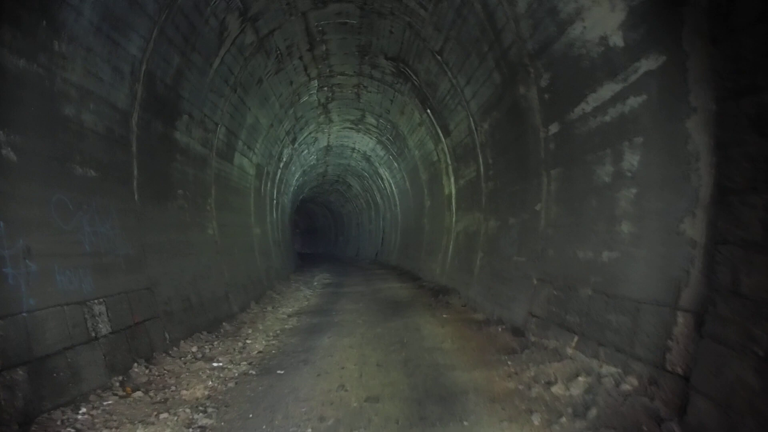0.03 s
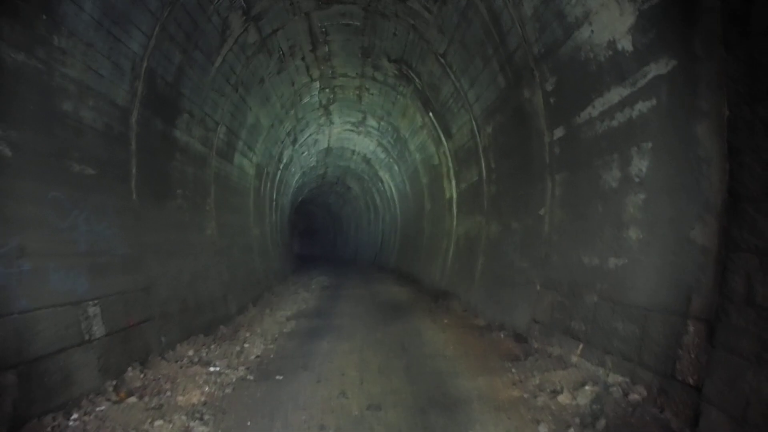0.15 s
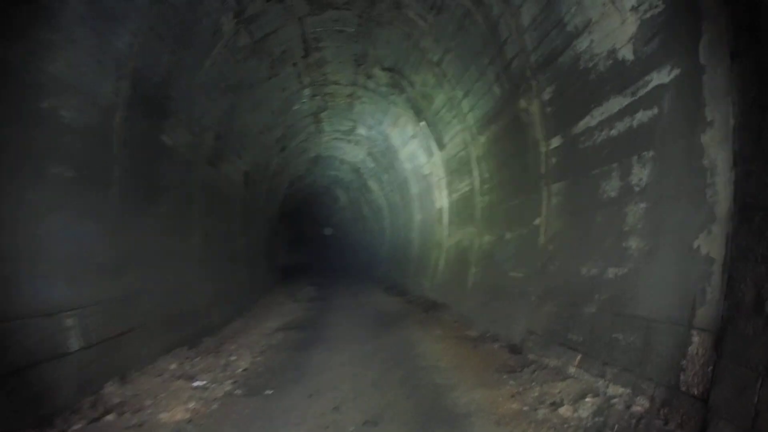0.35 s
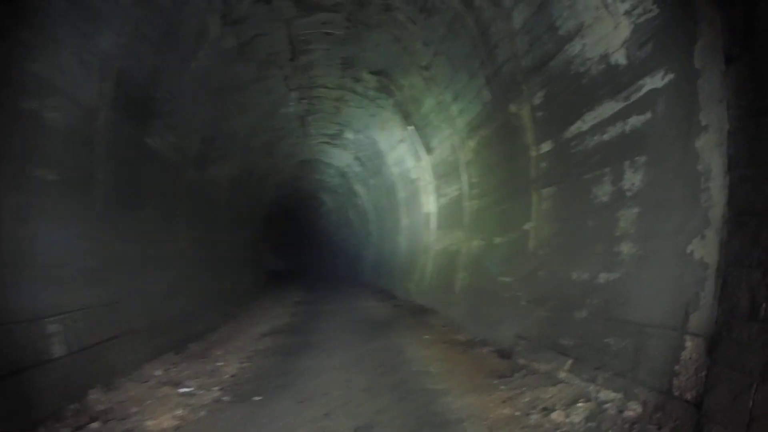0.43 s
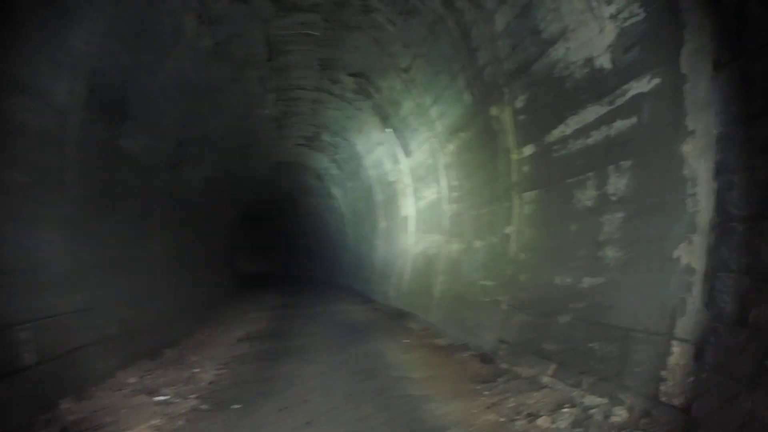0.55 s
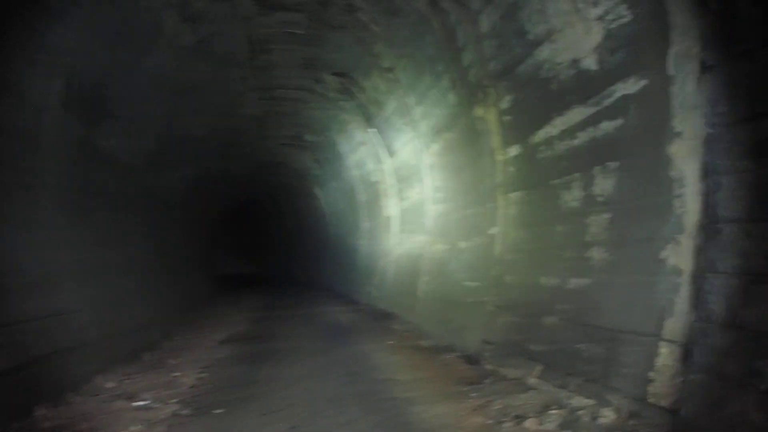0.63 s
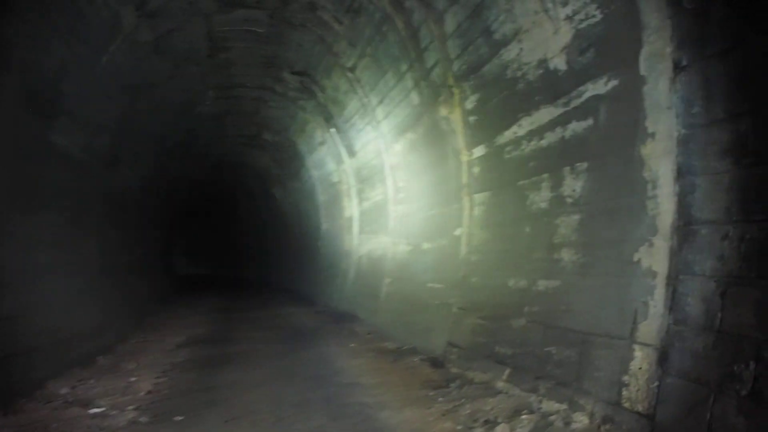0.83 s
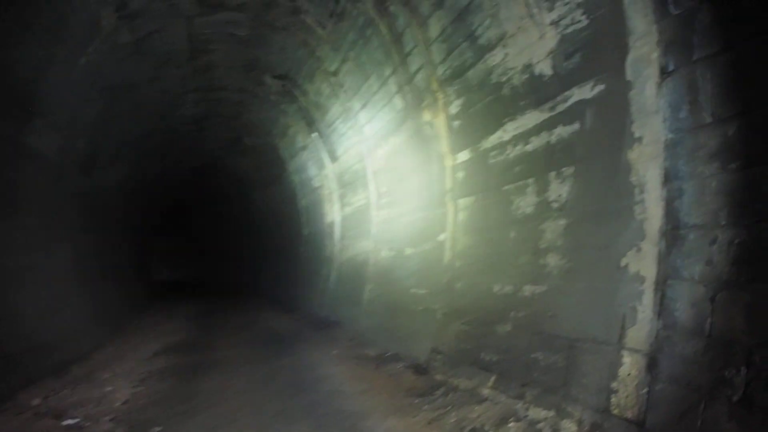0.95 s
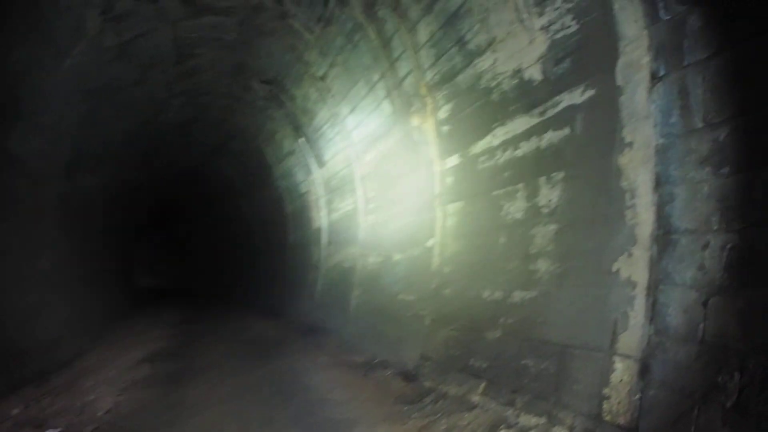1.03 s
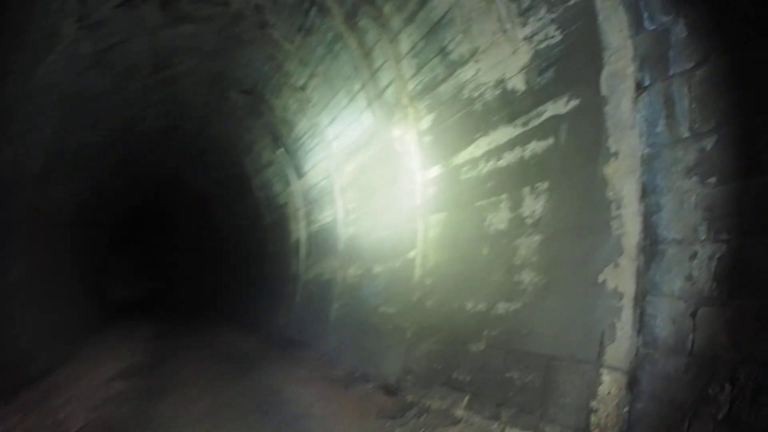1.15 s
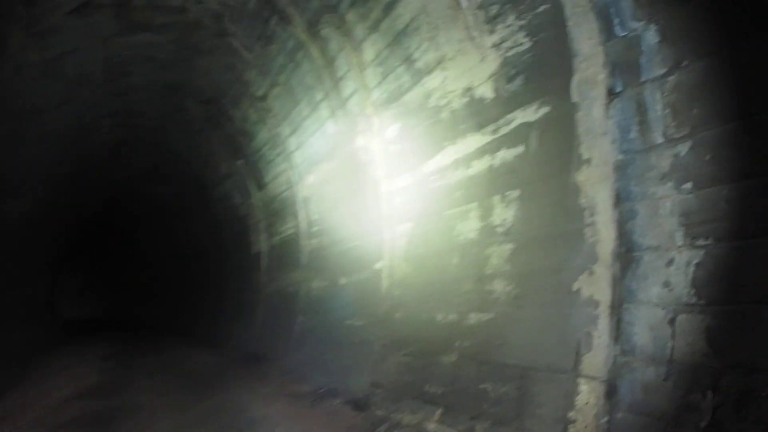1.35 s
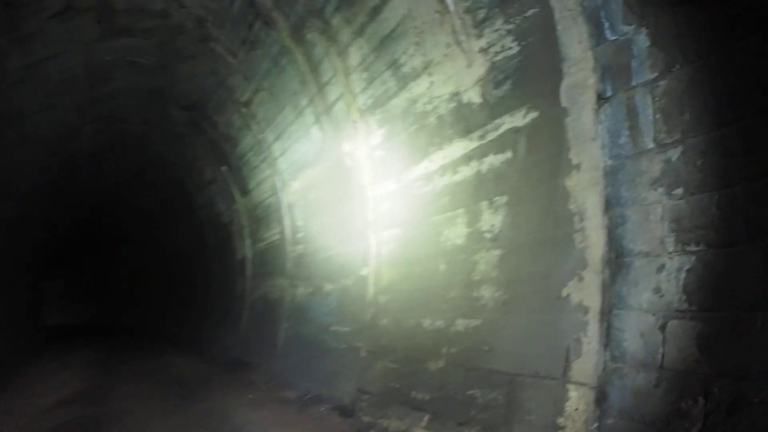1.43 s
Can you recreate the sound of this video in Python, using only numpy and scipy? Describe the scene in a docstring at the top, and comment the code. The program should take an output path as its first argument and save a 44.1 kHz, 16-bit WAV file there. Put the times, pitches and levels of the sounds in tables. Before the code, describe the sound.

Two slow footsteps on gravelly ground, the first a dull, sandy crunch, the second sharper with clicking pebbles. The microphone moves with the walker, and the long tunnel adds a hollow echo, a deep rumble and softly rushing air.

```python
"""Slow footsteps on gravelly ground in a long stone tunnel, heard from the walker's hand.
Each sole lands in a cluster of dull thuds, crushes grit, slides on sand and knocks loose stones
together; in between, a shoe scrapes faintly. The arched roof rings and echoes over a low, steady
rumble and a soft rush of air."""
import sys
import numpy as np
from scipy import signal
from scipy.fft import rfft, irfft, next_fast_len
from scipy.io import wavfile

SR = 44100
rng = np.random.default_rng(int(sys.argv[2]) if len(sys.argv) > 2 else 0)


def bounce(signal):
    """Save signal as a 16-bit WAV file at the path given by the first command-line argument."""
    frames = np.transpose(np.atleast_2d(signal))
    limited = np.clip(frames, -1, 1)
    pcm = np.round(limited * 32767).astype(np.int16)
    wavfile.write(sys.argv[1], SR, pcm)


N = 66150

# how alike left and right are for sound from all around: f/Hz, likeness (1 = the same)
ROOM_LIKENESS = [(100, 0.97), (1000, 0.68), (1800, 0.16), (4000, 0)]
# how alike they are for sound straight from the feet: f/Hz, likeness
FOOT_LIKENESS = [(500, .98), (1000, 0.8), (2000, -0.14)]
TOP_HZ = 15830  # the highest pitch the microphones pick up


def amp(db):
    """Turn decibels into a gain."""
    return 10 ** (np.asarray(db) / 20)


def unit(x):
    """Scale a signal to an average (rms) level of 1."""
    return x / np.sqrt(np.mean(x ** 2) + 1e-20)


def along(points, hz):
    """Read a curve of (frequency, value) points at hz, on a log frequency axis."""
    f, value = np.transpose(points)
    return np.interp(np.log(hz + 1), np.log(f + 1), value)


def since(start):
    """Seconds since start, zero before it."""
    return np.maximum(np.arange(N) / SR - start, 0)


def filtered(x, response):
    """Multiply each frequency in x by response(hz)."""
    size = next_fast_len(N + SR // 4)
    hz = np.fft.rfftfreq(size, 1 / SR)
    return irfft(rfft(x, size) * response(hz), size)[..., :N]


def spread(pair, alike, response=np.ones_like):
    """Filter two unrelated signals and mix them into left and right with the given likeness."""
    def mid_and_side(hz):
        likeness = np.clip(along(alike, hz), -.99, .995)
        return response(hz) * np.sqrt([1 + likeness, 1 - likeness]) / np.sqrt(2)
    mid, side = filtered(pair, mid_and_side)
    return np.array([mid + side, mid - side])


def coloured(pair, spectrum, alike):
    """A stereo signal of level 1 with the given tone colour."""
    return unit(spread(pair, alike, lambda hz: amp(along(spectrum, hz))))


def noise():
    """Two unrelated white noises."""
    return rng.standard_normal((2, N))


def background(air_db=-51, rumble_db=-53):
    """Air rushes softly through the tunnel over a deep rumble."""
    # tone colours of the air and the rumble: f/Hz, relative level/dB
    air_colour = [(35, -50), (62, -2.5), (80, -3), (110, -3.5), (200, -19), (350, -9.5), (480, -17),
                  (700, -11.5), (1050, -12), (1300, -19.5), (1650, -17), (3300, -24.5), (4700, -29.5),
                  (6800, -39.5), (9000, -39), (15500, -45.5)]
    rumble_colour = [(20, -32), (38, -8), (47, -3), (54, -4), (63, -13.5), (110, -44.5)]
    air = amp(air_db) * coloured(noise(), air_colour, ROOM_LIKENESS)
    rumble = amp(rumble_db) * coloured(noise(), rumble_colour, ROOM_LIKENESS)
    return air + rumble


def thuds(ring_cycles=6.2, rise_cycles=0.47, weight_s=0.33, weight_db=-32, weight_hz=175):
    """Each touch of the sole is a dull knock of a few cycles; the body's weight adds a deeper one."""
    # the sole meeting the ground: t/s, peak level/dB, f/Hz
    touches = [(.2195, -30, 594), (.2265, -21.5, 640), (.2322, -27, 860), (.2372, -29.5, 690),
               (.2438, -31, 930), (0.253, -33.5, 420), (.2662, -24.5, 940), (0.27, -21, 603),
               (0.2871, -30, 920), (0.2903, -26, 199), (.2928, -24, 640), (0.3007, -24.5, 417),
               (0.3136, -26.5, 356), (.4252, -32.5, 533), (1.0693, -40, 534), (1.0807, -31, 504),
               (1.089, -42, 282), (1.1150, -34, 530), (1.2238, -35, 310), (1.2243, -34, 593),
               (1.2583, -39.5, 340), (1.2673, -41, 510)]
    out = np.zeros(N)
    for start, db, hz in touches:
        cycles = since(start) * hz
        rise = 1 - np.exp(-(cycles / rise_cycles) ** 2)
        knock = np.sin(2 * np.pi * cycles) * amp(-60 * cycles / ring_cycles) * rise
        out += amp(db) * knock / np.abs(knock).max()
    t = since(weight_s)
    weight = amp(weight_db - 60 * t / 0.066) * np.sin(2 * np.pi * weight_hz * t)  # fades in 66 ms
    return out + weight


def grains(per_s=7000, spread_db=2.5):
    """Tiny cracks at random moments, a few much louder than the rest."""
    hit = rng.random(N) < per_s / SR
    return hit * noise() * amp(spread_db * np.minimum(rng.exponential(size=N), 3))


def gravel(attack_s=0.0059, release_db_per_s=239):
    """Packed soil, small stones and sand crackle while the sole presses on them."""
    # the ground giving way: t/s, hold/s, soil level/dB, crunch level/dB, crunch f/Hz, grit level/dB
    crushes = [(0.221, 0.028, -35.5, -42.5, 1920, -59.5), (.256, 0.025, -55, -43.5, 1920, -50.5),
               (0.284, 0.0047, -38, -41, 1530, -53), (.322, 0.0073, -48.5, -47.5, 1630, -59),
               (0.392, 0.017, -46.5, -52, 1520, -61), (0.483, 0.054, -55.5, -70, 1980, -67),
               (0.588, .026, -60.5, -79, 2000, -61), (1.068, 0.024, -49.5, -60, 2030, -64.5),
               (1.223, 0.029, -53.5, -47.5, 2640, -59), (1.283, .015, -56, -48.5, 2270, -82)]
    # tone colour of crunching stones: multiple of the crunch pitch, relative level/dB
    crunch_colour = [(.25, 1.5), (.62, -16), (.78, 4), (1.25, 3.5), (1.6, -2.5), (2.2, -12.5), (3.2, -23.5),
                     (8, -34)]
    # tone colours of dull soil and bright grit: f/Hz, relative level/dB
    soil_colour = [(40, -28), (90, -7.5), (170, 8.5), (400, 4.5), (700, 3.5), (1030, 3), (1300, -9.5),
                   (2500, -31.5)]
    grit_colour = [(2500, -7), (5800, -11), (7800, -0.5), (9000, 1.5), (13000, -10), (16000, -31)]
    crunch, soil_level, grit_level = np.zeros((2, N)), np.zeros(N), np.zeros(N)
    for start, hold, soil_db, crunch_db, hz, grit_db in crushes:
        release = amp(-release_db_per_s * since(start + attack_s + hold))
        press = np.minimum(since(start) / attack_s, 1) * release
        colour = [(hz * multiple, db) for multiple, db in crunch_colour]
        crunch += amp(crunch_db) * press * coloured(grains(), colour, FOOT_LIKENESS)
        soil_level = np.hypot(soil_level, amp(soil_db) * press)  # overlapping presses add in power
        grit_level = np.hypot(grit_level, amp(grit_db) * press)
    soil = soil_level * coloured(grains(), soil_colour, FOOT_LIKENESS)
    grit = grit_level * coloured(grains(), grit_colour, FOOT_LIKENESS)
    return crunch + soil + grit


def sliding_sand(width_hz=690):
    """Sand slides under the sole: a thin, grainy hiss whose pitch climbs as the pressure grows."""
    # slides: t/s, length/s, level/dB, first f/Hz, last f/Hz
    slides = [(0.228, .048, -53, 7300, 8750), (0.291, .045, -57.5, 8130, 8620),
              (1.238, 0.0107, -49, 8440, 8620)]
    out = np.zeros((2, N))
    for start, length, db, from_hz, to_hz in slides:
        progress = np.minimum(since(start) / length, 1)
        phase = 2 * np.pi * np.cumsum(from_hz + (to_hz - from_hz) * progress) / SR
        flutter = filtered(np.array([grains(), grains()]), lambda hz: 1 / (1 + (hz / width_hz) ** 2))
        hiss = unit(flutter[0] * np.cos(phase) + flutter[1] * np.sin(phase))
        out += amp(db) * np.sin(np.pi * progress) * hiss
    return out


def stones(rise_s=0.00033, clack_fade_s=0.0092, snap_fade_s=0.015, clack_top_hz=9500):
    """Pebbles knock: a clack pitched by the stone's size and a snap, dull for some, bright for others."""
    # knocks: t/s, clack level/dB, clack f/Hz, snap level/dB, snap's upper edge f/Hz
    knocks = [(.2383, -34.5, 7520, -55, 13000), (0.273, -36, 7700, -48, 13000),
              (0.2867, -37, 2550, -48, 8000), (0.5778, -37.5, 1070, -42, 11900),
              (1.081, -34.5, 1560, -42, 3300), (1.1138, -37, 1660, -47, 3020),
              (1.2239, -25.5, 1580, -32.5, 6800), (1.2338, -28, 2990, -36, 11000),
              (1.2497, -34.5, 1540, -46, 9000), (1.2566, -25.5, 1960, -31.5, 13000),
              (1.2675, -28.5, 2520, -41, 12060)]
    # the tones a stone rings with: multiple of the clack pitch, relative level/dB
    stone_tones = [(1, 0.5), (1.19, -7.5), (1.47, -11.5), (1.83, -9), (2.3, -18)]
    # tone colour of the snap: f/Hz, relative level/dB
    snap_colour = [(1500, -5), (3400, 5), (6000, -15), (8300, 1), (11000, -2), (16000, -43)]
    out = np.zeros((2, N))
    t = np.arange(SR // 20) / SR
    rise = 1 - np.exp(-(t / rise_s) ** 2)
    crack = coloured(noise(), snap_colour, FOOT_LIKENESS)
    for start, clack_db, pitch, snap_db, edge_hz in knocks:
        span = slice(round(start * SR), round(start * SR) + len(t))
        for multiple, db in stone_tones:
            hz = pitch * multiple
            # shifting left against right sets how alike they are
            shift = np.arccos(np.clip(along(FOOT_LIKENESS, hz), -1, 1)) * rng.choice([-1, 1]) / 2
            phase = 2 * np.pi * (hz * t + rng.random()) + np.array([[shift], [-shift]])
            level = rise * amp(clack_db + db - 60 * t / clack_fade_s)
            weakening = np.hypot(1, (hz / clack_top_hz) ** 8)  # very high tones barely ring
            out[:, span] += level * np.sin(phase) / weakening
        snap = rise * amp(snap_db - 60 * t / snap_fade_s) * crack[:, span]
        low_pass = signal.butter(4, min(edge_hz, TOP_HZ), fs=SR)
        out[:, span] += signal.lfilter(*low_pass, snap)
    return out


def scrape(rub_db=-3.5, squeak_db=-0.5, pitch_wobble=0.038, wobbles_per_s=400):
    """A shoe drags a stone lightly: gritty rubbing with a faint, unsteady squeak."""
    # drags: middle t/s, half length/s, relative level/dB, squeak f/Hz
    drags = [(0.2657, 0.0011, -34, 2350), (.783, 0.019, -56.5, 1993), (.824, 0.0091, -49, 2050),
             (0.849, 0.0091, -50.5, 1780)]
    # the band of rubbing noise: f/Hz, width/Hz, relative level/dB
    rub_bands = [(2000, 1800, 6)]

    def rub_colour(hz):
        return sum(amp(db) * 1j * hz * width / (centre ** 2 - hz ** 2 + 1j * hz * width)
                   for centre, width, db in rub_bands) ** 2
    t = since(0)
    wobble = np.interp(t * wobbles_per_s, np.arange(2048), rng.standard_normal(2048))
    uneven_time = t + pitch_wobble * np.cumsum(wobble) / SR
    rub_level, squeak = np.zeros(N), np.zeros((2, N))
    for middle, half_length, db, hz in drags:
        stroke = amp(db) * np.exp(-.5 * ((t - middle) / half_length) ** 2)
        squeak += stroke * np.sin(2 * np.pi * (hz * uneven_time + rng.random((2, 1)) / 2))
        rub_level += stroke
    rub = rub_level * unit(spread(grains(), FOOT_LIKENESS, rub_colour))
    return amp(squeak_db) * squeak + amp(rub_db) * rub


def reverb(fade_times, build_s):
    """Countless reflections blur into noise that builds up, then fades at each frequency's own rate."""
    hz, t, spectrum = signal.stft(noise(), SR, nperseg=256)
    fade_s = np.maximum(along(fade_times, hz), .02)[:, None]
    tail = signal.istft(spectrum * amp(-60 * t / fade_s), SR, nperseg=256)[1][:, :N]
    tail = spread(tail, ROOM_LIKENESS) * (1 - np.exp(-since(0) / build_s))
    return tail / np.sqrt(np.sum(tail ** 2) / 2)


def tunnel(feet, short_db=-10.5, long_db=-19, ring_db=-63, echo_db=-21, echo_s=0.15):
    """A short reverb swells and dies, a quieter, longer one lingers, the arch rings, one echo returns."""
    # tones that ring across the arch: f/Hz, relative level/dB, time to fade by 60 dB/s
    arch_tones = [(127.4, -2.5, 2), (183.7, 2.5, 0.67), (210.8, -1, 1.16), (346, -2.5, 0.69),
                  (422.2, 8.5, 0.31), (541, 1.5, 0.28), (668, 6, 0.19), (724, -2, 0.091), (1017, 18, 0.087)]
    # the short and the long reverb: f/Hz, time to fade by 60 dB/s
    short_fades = [(150, 0.52), (600, 0.35), (2500, 0.33), (9000, 0.25), (16000, 0.19)]
    long_fades = [(100, 13.5), (600, 2.4), (2500, 1.4), (9000, 0.29), (16000, 0.55)]
    t = since(0)
    ring = sum(amp(db - 60 * t / fade_s) * np.cos(2 * np.pi * hz * t) for hz, db, fade_s in arch_tones)
    short = amp(short_db) * reverb(short_fades, build_s=0.023)
    long = amp(long_db) * reverb(long_fades, build_s=0.0072)
    echo = filtered(feet, lambda hz: amp(echo_db) * np.exp(-2j * np.pi * hz * echo_s))  # a plain delay
    return signal.fftconvolve(feet, short + long + amp(ring_db) * ring, axes=1)[:, :N] + echo


def scene():
    """The feet, the tunnel's answer and the steady background."""
    feet = thuds() + stones() + gravel() + sliding_sand() + scrape()
    return feet + tunnel(feet) + background()


def record(dry):
    """The microphones favour the left a little and pick up nothing above TOP_HZ."""
    # how much louder the left side is: f/Hz, level/dB
    left_boost = [(60, 2), (3000, 2), (14000, 0.5)]
    return filtered(dry, lambda hz: amp(np.outer([.5, -.5], along(left_boost, hz))) * (hz < TOP_HZ))


dry = scene()
out = record(dry)
bounce(out)
```